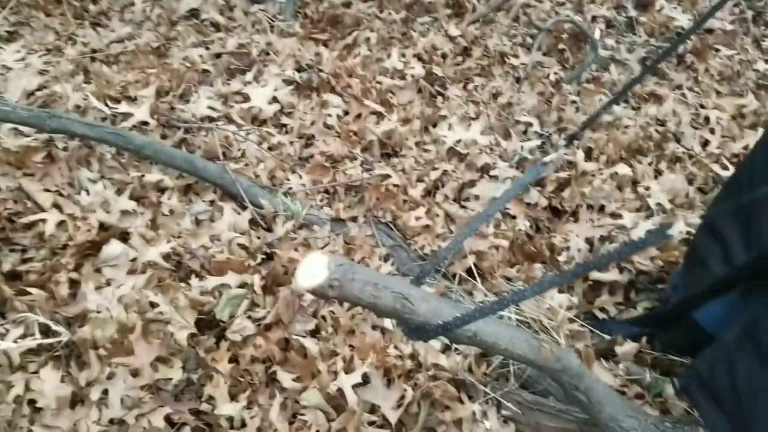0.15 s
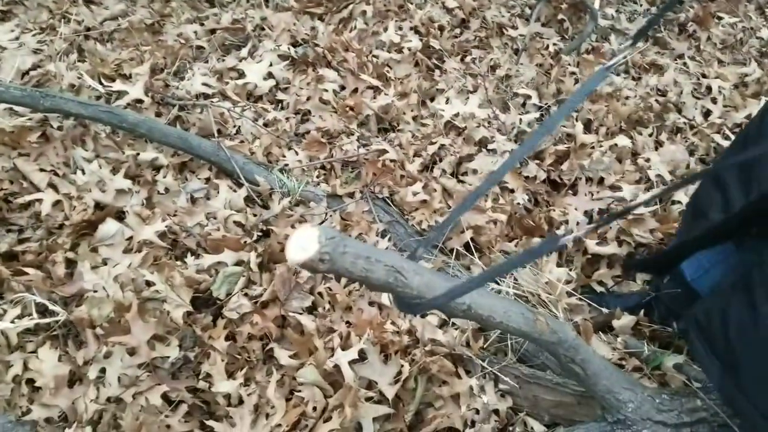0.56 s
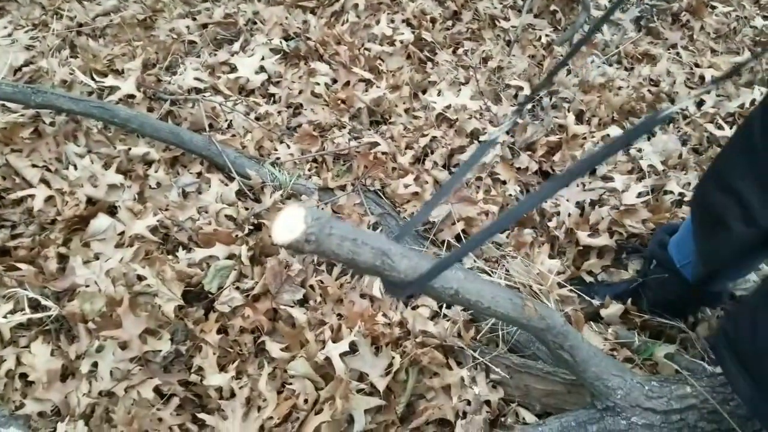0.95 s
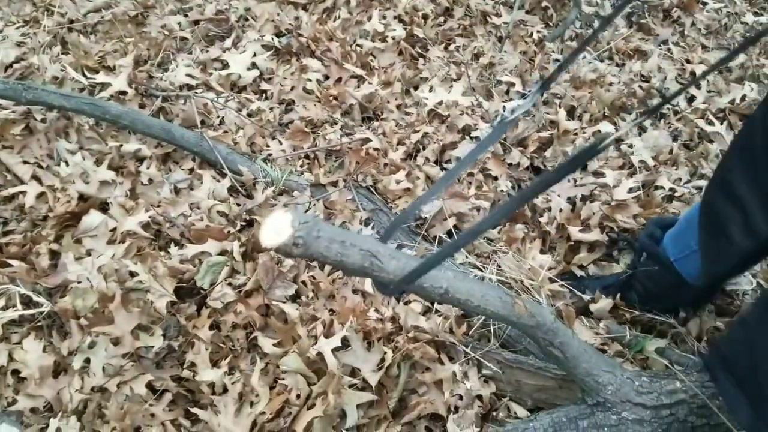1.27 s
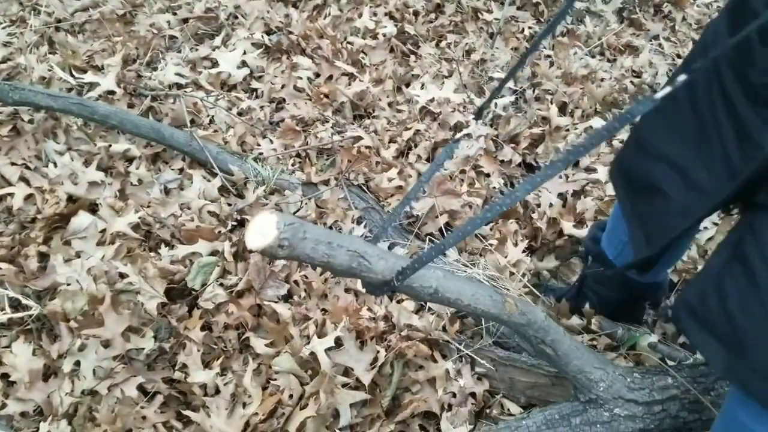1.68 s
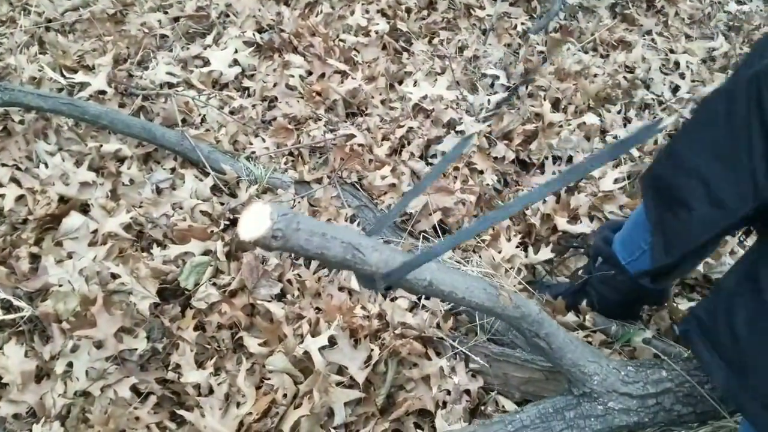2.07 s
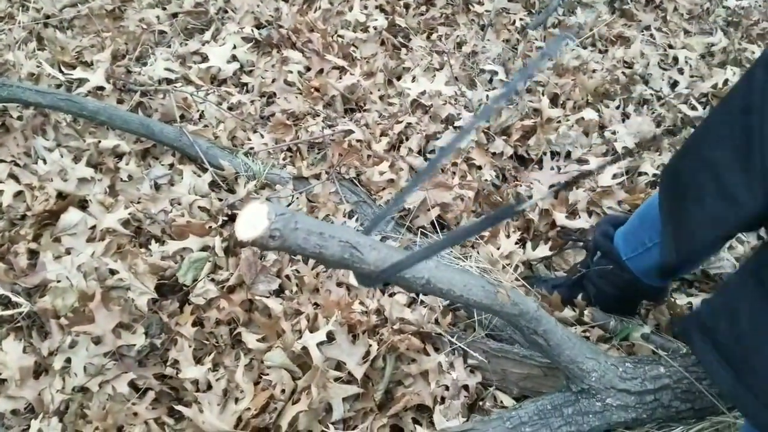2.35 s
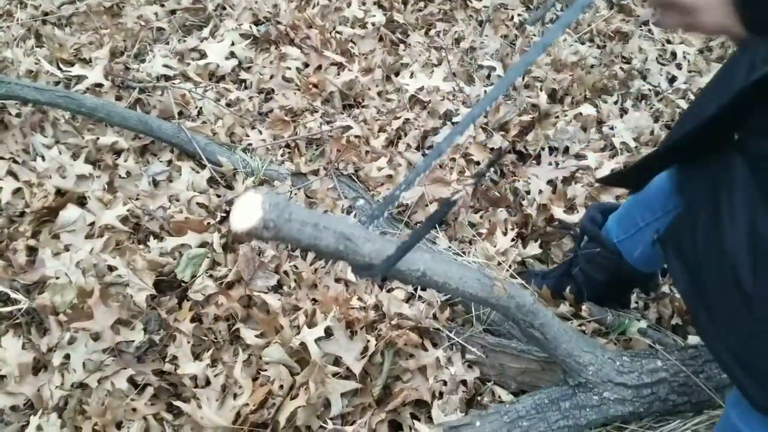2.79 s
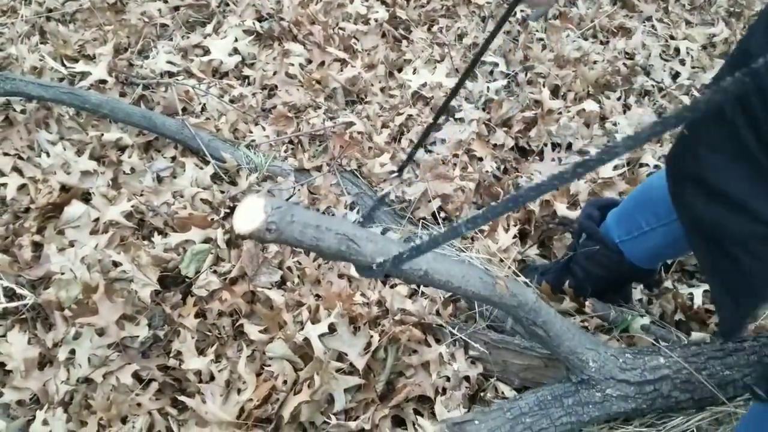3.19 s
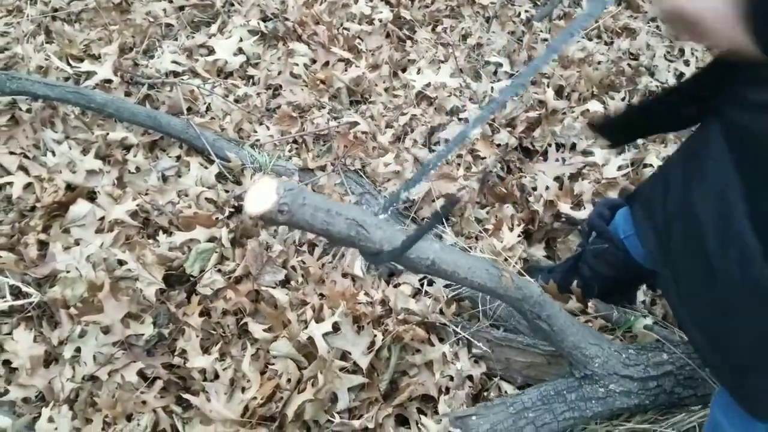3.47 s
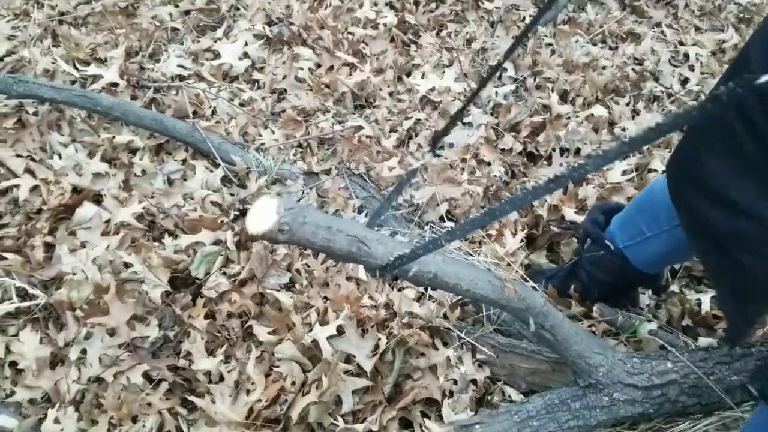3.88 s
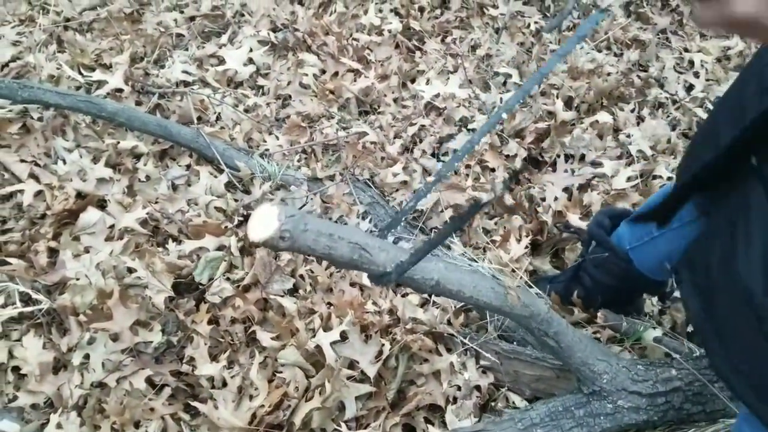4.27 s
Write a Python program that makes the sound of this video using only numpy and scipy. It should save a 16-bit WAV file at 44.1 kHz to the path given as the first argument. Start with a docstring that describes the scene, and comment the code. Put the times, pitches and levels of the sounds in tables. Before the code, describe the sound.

Short woody saw strokes scrape through a branch outdoors, with crisp leaf litter stirring, small snaps and a faint low traffic rumble.

```python
"""Chain saw-cut through a branch in dry leaves

A toothed chain is pulled to and fro through a thin branch: showers of tooth bites excite resonators
at the modes of the wood and noise bands of tearing fibres. Branch, chain and boots stir the litter into
bright hiss and coarse crunch (banded click showers), with lone snaps (filtered bursts) and soft ground
thumps (decaying sines). Distant traffic rumbles low and the open woodland hisses faintly (noise)."""
import sys
import numpy as np
from scipy import signal
from scipy.io import wavfile

SR = 44100
rng = np.random.default_rng(int(sys.argv[2]) if len(sys.argv) > 2 else 0)


def dump_mix(stems):
    """Bounce the given channels to the path in sys.argv[1] as a 16-bit WAV at rate SR."""
    frames = np.atleast_2d(stems).T  # one column per channel
    limited = np.clip(frames, -1, 1)  # hard clip at full scale
    pcm = np.round(limited * 32767).astype(np.int16)
    wavfile.write(sys.argv[1], SR, pcm)


N = 196089

# Saw strokes; levels are before the mix of rings and fibres, the last three relative to the bite:
# hold_start_s, bite_db, rise_s, hold_s, change_over_hold_db, mid_stroke_arch_db, fall_s,
# fine_rasp_db, main_bending_db, free_end_sway_db
SAW_STROKES = [(0.0, -40, .02, 0.035, -5.5, -0.8, 0.062, 18.5, -8, -21),
               (0.484, -34, 0.06, 0.12, 2, 2.5, 0.033, 3.5, 1.5, -13),
               (0.739, -23.5, 0.028, .11, -3.5, 3, 0.041, -2.5, -4.5, -17.5),
               (0.99, -26.5, 0.032, 0.054, -1, 1.5, 0.076, 2.5, -2.5, -13),
               (1.281, -24.5, 0.027, 0.055, -8, 0.5, 0.03, -1, -6.5, -16),
               (1.772, -45.5, 0.11, 0.034, 6.5, 1, 0.033, 9, -28, -24),
               (2.166, -27.5, 0.083, 0.063, -2, 6, 0.1, 0.5, 2, -16.5),
               (2.425, -31, 0.068, 0.071, -4.5, 4, 0.044, 2.5, 2.5, -19),
               (2.67, -30, 0.033, 0.11, -9.5, 3, 0.017, -0.5, 2.5, -28),
               (2.984, -24.5, 0.042, 0.13, -11.5, 0.5, 0.043, -4.5, -3, -26.5),
               (3.331, -30, 0.041, .14, -7, 6.5, 0.026, -1.5, -2.5, -24.5),
               (3.658, -29.5, 0.038, 0.17, -11.5, 7.5, .055, 1, 3.5, -24.5),
               (3.977, -41, 0.012, 0.034, -10, 1, 0.028, -11, 2.5, -27),
               (4.028, -30, 0.039, 0.12, -1.5, 5.5, 0.064, 0, -2.5, -29),
               (4.403, -43.5, 0.072, 0.047, -1, 2, .05, 0.5, -8, -16)]
# Growth of the bending mode along a stroke (early strokes start with it, later ones build it up):
# time_s, growth_db (from minus this to plus this over the hold)
BENDING_GROWTH = [(0.0, -3.5), (1.5, -2), (2.2, -0.5), (4.45, 3)]
# Pitches of the branch modes: pitch_hz
MODE_PITCHES = [304, 385, 435, 540, 680, 791, 960, 1215, 1460, 2095, 2290, 2800, 3300, 3445, 3680, 3945]
# Branch modes in the same order: width_hz (of the narrower of two resonators), relative_level_db
MODE_SHAPES = [(69.7, 10.5), (56, 14), (41.8, 4), (60.3, -8.5), (60, -10.5), (86, -10), (102, -8),
               (75, -5.5), (96, -7.5), (123, -10), (70, -17.5), (102, -16.5), (145, -13.5), (95, -7.5),
               (76, -15), (110, -8.5)]
# Broad sound of tearing fibres: frequency_hz, relative_density_db (per Hz)
FIBRE_SPECTRUM = [(500, -28.5), (900, -1), (1600, -11), (2300, -8.5), (3600, -9.5), (4400, -2.5),
                  (5200, -18)]
# Rustles of stirred leaves: hold_start_s, hiss_db, rise_s, hold_s, change_over_hold_db, fall_s,
# top_re_hiss_db, left_minus_right_db
LEAF_RUSTLES = [(0.0, -20.5, .05, 0.15, -14.5, 0.11, 2, 3), (0.297, -54.5, 0.041, 0.066, 2.5, .05, 1.5, 1),
                (0.451, -31.5, 0.063, .1, 6, 0.22, 3, 1), (0.697, -52, .1, .03, -11, .1, -8, 0.5),
                (0.808, -27, 0.46, 0.0087, 2.5, 0.19, 2, 4.5),
                (0.976, -23.5, 0.17, 0.063, -7.5, 0.34, 3, 1),
                (1.206, -33.5, 0.17, 0.077, 3.5, 0.21, 4.5, 2.5),
                (1.42, -50.5, 0.18, 0.021, -1.5, 0.052, 9, 13.5),
                (1.492, -30.5, 0.11, 0.041, -2.5, 0.18, 1.5, 7), (1.596, -46, .1, 0.018, -9, .1, -5, 8),
                (1.727, -25, 0.24, 0.11, -6, 0.32, 2, 4.5), (1.934, -33.5, 0.28, 0.14, -3.5, .2, 3, 3.5),
                (2.149, -30.5, 0.47, 0.071, 0.5, 0.23, 0.5, 6), (2.309, -32, 0.33, 0.14, 0.5, 0.18, 2, -1),
                (2.675, -32, 0.041, 0.052, -7, 0.15, 1, 5), (2.86, -50.5, 0.035, .005, -2.5, 0.06, 1, 18),
                (2.993, -34, 0.074, 0.081, -9, 0.21, 0.5, 8), (3.322, -39, 0.057, 0.08, 5, 0.18, -1.5, 7),
                (3.629, -31.5, 0.046, 0.12, 4, 0.18, -1.5, 5), (3.977, -48, 0.0078, 0.088, 19, 0.24, 0, 7),
                (4.238, -56, .04, .01, -2, 0.043, 0, 7), (4.301, -42, 0.02, .01, -12.5, 0.13, 0, 1),
                (4.409, -39, 0.047, 0.042, 10, .1, -3, 10)]
# Leaf hiss and its top: frequency_hz, relative_density_db (per Hz)
HISS_SPECTRUM = [(4800, 2), (5400, 0), (6700, -2.5), (8300, -0.5), (9800, -4.5), (12000, 0.5), (14000, -4),
                 (17000, -9)]
# Coarse crunch of the litter: frequency_hz, relative_density_db (per Hz)
CRUNCH_SPECTRUM = [(330, -9.5), (500, -7), (1000, -11), (1300, -12.5), (3300, -11.5), (4400, -10),
                   (5000, -17)]
# Course of the crunch: time_s, level_db
CRUNCH_COURSE = [(0.0, -52.5), (0.46, -52.5), (0.69, -47.5), (0.79, -29), (0.93, -47.5), (1.05, -61),
                 (1.25, -48), (2.1, -51.5), (2.34, -53), (2.47, -57), (2.73, -58.5), (4.03, -61),
                 (4.24, -54), (4.44, -58)]
# Far rumble: frequency_hz, relative_density_db (per Hz)
RUMBLE_SPECTRUM = [(30, -30), (45, -20.5), (62, -3), (120, -1), (190, -6.5), (260, -14.5), (320, -11),
                   (420, -13)]
# Course of the rumble: time_s, level_db
RUMBLE_COURSE = [(0.0, -41), (0.3, -47.5), (0.9, -44.5), (1.5, -47.5), (2.2, -46.5), (2.9, -53.5),
                 (3.8, -47), (4.45, -48.5)]
# Lone leaf and twig snaps: start_s, peak_db (before panning), centre_hz, left_minus_right_db
LEAF_SNAPS = [(0.297, -35, 8150, 21), (0.538, -15, 3300, -16), (1.204, -14, 12000, -14),
              (1.2831, -11, 3160, -14), (1.5415, -14, 7460, -1), (1.6097, -21, 12200, 7),
              (2.03, -12, 12600, -15), (2.0912, -19, 11700, -10), (2.2774, -12, 7660, -7),
              (2.5745, -36, 6900, 10), (2.6714, -23, 3930, 10), (2.6874, -37, 3950, -2.5),
              (2.855, -32, 7800, 20), (3.1114, -23, 3140, 12), (3.597, -43.5, 5450, -26.5),
              (3.818, -22.5, 3420, 14), (3.982, -24.5, 6500, 9), (4.2462, -32, 5540, 7),
              (4.2996, -29.5, 5800, -7)]
# Branch knocking the ground: start_s, level_db (before onset and decay), pitch_hz
GROUND_THUMPS = [(0.992, -34, 105), (2.503, -28, 76), (2.76, -27, 120)]
# Power common to both channels: frequency_hz, share (0-1)
COMMON_SHARE = [(60, 0.97), (250, 0.78), (500, 0.61), (1000, 1), (2000, 0.067), (4000, 0.28), (8000, 0.15),
                (15000, 0.041)]
# Stereo balance: frequency_hz, left_minus_right_db
STEREO_BALANCE = [(60, -1.5), (130, -1), (290, -1), (640, -1.5), (1200, 2.5), (2500, -1.5), (5500, 0.5),
                  (11000, -8.5), (15000, -4.5)]
# Phase of the common part: frequency_hz, left_lead_rad
PHASE_LEAD = [(60, -1.17), (250, 0), (500, 0.54), (1210, 1.52), (2670, -2), (3360, -1.1), (7150, -6),
              (10500, -8.5), (16000, 3)]

STEP = 40       # samples between envelope points
EDGE_DB = 30    # dB that the rise and fall times count
STROKE_EDGE_POWER = 1.064   # rounds stroke edges at the top, steepens them towards the turning points
# share of the bite's rise and fall, in dB, that these are spared
RASP_LINGERS, BEND_LINGERS, SWAY_LINGERS = 0.24, 0.067, 0.073
TOP_DULLS = 0.24    # extra dB the top of the hiss loses per dB that a rustle's edge is below full
AIR_DB = -71        # white noise level re unit rms, before its high-pass
CUTOFF_HZ = 15900


def from_db(db):
    """Logarithmic level: decibels to amplitude gain."""
    return 10 ** (np.asarray(db) / 20)


def rms_one(x):
    """Power normalisation: scale to unit rms."""
    return x / np.sqrt(np.mean(x ** 2) + 1e-20)


def in_time(rows):
    """Linear interpolation: curve columns at every sample."""
    s, *columns = np.transpose(rows)
    return [np.interp(np.arange(N) / SR, s, c) for c in columns]


def at_hz(points, hz):
    """Spectral interpolation on a logarithmic frequency axis."""
    table_hz, values = np.array(points).T
    return np.interp(np.log(hz), np.log(table_hz), values)


def swell(start_s, rise_s, hold_s, fall_s):
    """Exponential growth and decay: edges in dB (0 while held) and progress 0-1, every STEP samples."""
    t = np.arange(0, N + STEP, STEP) / SR - start_s
    hold_s = max(hold_s, .002)
    rising = t / max(rise_s, .002)      # the rise ends where the hold starts
    falling = (hold_s - t) / max(fall_s, .002)
    edge_db = EDGE_DB * np.minimum(0, np.minimum(rising, falling))
    return edge_db, np.clip(t / hold_s, 0, 1)


def every_sample(envelopes):
    """Linear interpolation: fill envelopes in between their points."""
    return np.array([np.interp(np.arange(N) / STEP, np.arange(len(e)), e) for e in envelopes])


def grains(per_s, spread_db):
    """Poisson-like shot noise: two sets of three random click showers with uneven sizes."""
    draw = rng.random((2, 3, N))
    born = draw < per_s / SR
    luck = draw[born] * SR / per_s      # again uniform: gives sign and size
    size = np.minimum(-np.log(np.abs(2 * luck - 1) + 1e-9), 5)
    out = np.zeros((2, 3, N))
    out[born] = np.sign(luck - .5) * from_db(spread_db * size)
    return rms_one(out)


def crackle(per_s, spread_db, t60):
    """Relaxation: a gain jumps at random breaks or catches and sinks back by 60 dB in t60 seconds."""
    size = from_db(spread_db * np.minimum(rng.exponential(1, N), 3))
    jumps = (rng.random(N) < per_s / SR) * size
    decay = from_db(-60 / (t60 * SR))
    return 1 + signal.lfilter([1], [1, -decay], jumps + 1e-18)


def flicker(depth_db, rate_hz):
    """Random modulation: twice low-passed noise makes a gain wander, depth_db in rms."""
    r = np.exp(-2 * np.pi * rate_hz * STEP / SR)
    noise = rng.standard_normal(N // STEP + 1002)
    slow = signal.lfilter([1], [1, -2 * r, r * r], noise)[1000:]    # drop the filter's settling
    return np.interp(np.arange(N) / STEP, np.arange(len(slow)), from_db(depth_db * rms_one(slow)))


def sides(db):
    """Interaural level difference: left and right gains."""
    return from_db(np.array([db / 2, -db / 2]).reshape(2, -1))


def spread(parts, hz):
    """Partial coherence: a common part that leads in one channel, and a part of each channel's own."""
    alike = np.clip(at_hz(COMMON_SHARE, hz), .01, .99)
    lag = round(at_hz(PHASE_LEAD, hz) / (2 * np.pi * hz) * SR)      # whole samples
    common = np.array([parts[0], np.roll(parts[0], lag)])
    mixed = np.sqrt(alike) * common + np.sqrt(1 - alike) * parts[1:]
    return sides(at_hz(STEREO_BALANCE, hz)) * mixed


def resonance(x, hz, width_hz):
    """Damped resonator: a two-pole peak of about unit gain."""
    r = np.exp(-np.pi * width_hz / SR)
    zeros = np.array([1, 0, -1]) * (1 - r * r) / 2
    poles = [1, -2 * r * np.cos(2 * np.pi * hz / SR), r * r]
    return signal.lfilter(zeros, poles, x)


def highpass(x, order, hz):
    """Butterworth high-pass: attenuate what lies below hz."""
    return signal.sosfilt(signal.butter(order, hz, "high", fs=SR, output="sos"), x)


def coloured(source, spectrum, patchy_db, patch_rate, step):
    """Filter bank: bands step octaves wide, each with its own level and flicker."""
    first, last = np.log2(spectrum[0][0]), np.log2(spectrum[-1][0])
    out = 0
    for k, low in enumerate(2 ** np.arange(first, last - step / 2, step)):
        high = low * 2 ** step
        centre = np.sqrt(low * high)
        bandpass = signal.butter(2, [low, high], "band", fs=SR, output="sos")
        band = signal.sosfilt(bandpass, source[k % 2])
        gain = from_db(at_hz(spectrum, centre)) * flicker(patchy_db, patch_rate)
        out = out + gain * spread(band, centre)
    return out


def stroke_gains():
    """Force envelopes: gains of bites, rasp, bend and sway, summed over the strokes."""
    gains = 0
    for (start_s, bite_db, rise_s, hold_s, change_db, arch_db, fall_s,
         rasp_db, bend_db, sway_db) in SAW_STROKES:
        edge_db, along = swell(start_s, rise_s, hold_s, fall_s)
        edge_db = -EDGE_DB * (-edge_db / EDGE_DB) ** STROKE_EDGE_POWER
        force_db = bite_db + edge_db + change_db * along + arch_db * np.sin(np.pi * along)
        growth_db = np.interp(start_s, *np.transpose(BENDING_GROWTH)) * (2 * along - 1)
        gains = gains + from_db([force_db,
                                 force_db + rasp_db - RASP_LINGERS * edge_db,
                                 force_db + bend_db + growth_db - BEND_LINGERS * edge_db,
                                 force_db + sway_db - SWAY_LINGERS * edge_db])
    return every_sample(gains)


def saw():
    """Modal excitation: bunched tooth bites ring the branch's modes and tear its fibres."""
    teeth = grains(2200, spread_db=2.5) * crackle(220, spread_db=0.0, t60=0.0091) * flicker(1.0, 40)
    bites, rasp, bend, sway = (teeth * gain for gain in stroke_gains())
    rings = 0
    for k, (hz, (width_hz, level_db)) in enumerate(zip(MODE_PITCHES, MODE_SHAPES)):
        drive = sway if hz < 400 else bend if hz < 490 else bites if hz < 1750 else rasp
        # two resonators in series give steep skirts
        ringing = resonance(resonance(drive[k % 2], hz, 2 * width_hz), hz, width_hz)
        unsteady = flicker(1 if hz < 490 else 2.2, 25)      # the moving kerf feeds the modes unevenly
        rings = rings + from_db(level_db) * unsteady * spread(ringing, hz)
    coarse = coloured(bites, FIBRE_SPECTRUM[:3], patchy_db=4.0, patch_rate=18, step=0.4315)
    fine = coloured(rasp, FIBRE_SPECTRUM[2:], patchy_db=1.0, patch_rate=30, step=0.486)
    # the tearing is thin below the bending mode, so a high-pass clears its lows
    tearing = highpass(coarse + fine, 4, 400)
    return from_db(19.0) * rings + from_db(12.5) * tearing


def leaves():
    """Friction shot noise: rubbing brittle leaves make a dense bright shower and a duller crunch."""
    hiss_power, top_power = 0, 0
    for start_s, hiss_db, rise_s, hold_s, change_db, fall_s, top_db, pan_db in LEAF_RUSTLES:
        edge_db, along = swell(start_s, rise_s, hold_s, fall_s)
        power = (sides(pan_db) * from_db(hiss_db + edge_db + change_db * along)) ** 2
        hiss_power = hiss_power + power
        top_power = top_power + power * from_db(top_db + TOP_DULLS * edge_db) ** 2
    shower = grains(9000, spread_db=-1.0) * flicker(0.09, 30) * crackle(76, spread_db=2.0, t60=0.0034)
    hiss = rms_one(coloured(shower, HISS_SPECTRUM[:5], patchy_db=2.24, patch_rate=11.3, step=0.255))
    hiss = highpass(hiss, 8, 4850)
    top = rms_one(coloured(shower, HISS_SPECTRUM[4:], patchy_db=0.4, patch_rate=13, step=0.194))
    coarse_shower = grains(6000, spread_db=3.0)
    crunch = rms_one(coloured(coarse_shower, CRUNCH_SPECTRUM, patchy_db=2.5, patch_rate=25.0, step=0.466))
    bright = every_sample(np.sqrt(hiss_power)) * hiss + every_sample(np.sqrt(top_power)) * top
    return bright + from_db(in_time(CRUNCH_COURSE)[0]) * crunch


def rumble():
    """Band-limited noise: distant traffic as lumpy low noise."""
    source = rng.standard_normal((2, 3, N))
    noise = coloured(source, RUMBLE_SPECTRUM, patchy_db=2.5, patch_rate=14.0, step=0.516)
    return from_db(in_time(RUMBLE_COURSE)[0]) * rms_one(noise)


def air():
    """Uncorrelated noise: a faint steady bright hiss of open woodland, its own in each channel."""
    return from_db(AIR_DB) * highpass(rng.standard_normal((2, N)), 2, 3500)


def snaps():
    """Impulsive fracture: a sharp break and milliseconds of splinters, broad around one centre."""
    length = 600    # samples
    out, t = np.zeros((2, N)), np.arange(length) / SR
    bursts = rng.standard_normal((len(LEAF_SNAPS), 3, length)) * from_db(-60 * t / 0.014)
    bursts[:, 0, 0] = 3.9       # the break itself, common to both channels
    for (start_s, peak_db, hz, pan_db), burst in zip(LEAF_SNAPS, bursts):
        at = round(start_s * SR)
        sound = resonance(burst[0] + .6 * burst[1:], min(hz, 12000), .8 * hz)
        sound = signal.lfilter(*signal.butter(2, .45 * hz, "high", fs=SR), sound)
        out[:, at:at + length] += from_db(peak_db) * sides(pan_db) * sound / np.abs(sound).max()
    return out


def thumps():
    """Damped oscillation: the branch knocks the ground, a soft low push that rings a few cycles."""
    length = 5000   # samples
    out, t = np.zeros(N), np.arange(length) / SR
    for start_s, level_db, hz in GROUND_THUMPS:
        at = round(start_s * SR)
        onset = 1 - np.exp(-t / .004)
        decay = from_db(level_db - 60 * t / .13)
        out[at:at + length] += decay * onset * np.sin(2 * np.pi * hz * t)
    return out


def scene():
    """Superposition: all sources add in the two channels."""
    return saw() + leaves() + rumble() + air() + snaps() + thumps()


def record(dry):
    """Low-pass filtering: a steep elliptic filter cuts the top."""
    return signal.sosfilt(signal.ellip(10, .5, 55, CUTOFF_HZ, fs=SR, output="sos"), dry)


dry = scene()
out = record(dry)
dump_mix(out)
```